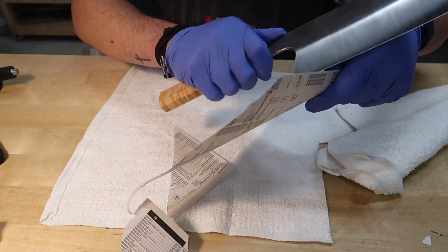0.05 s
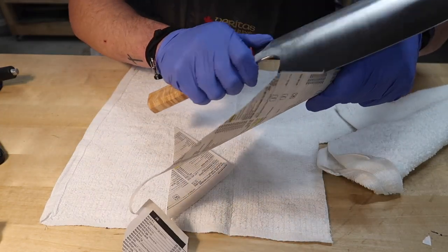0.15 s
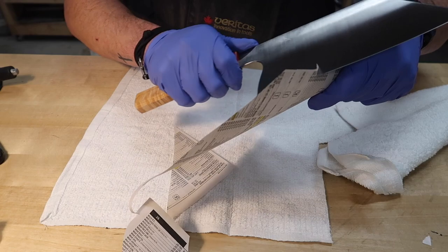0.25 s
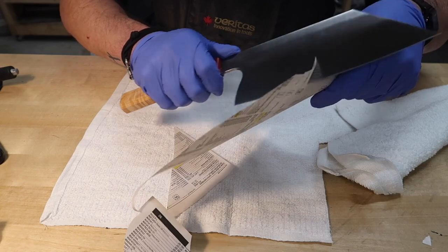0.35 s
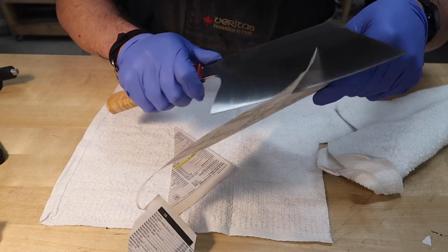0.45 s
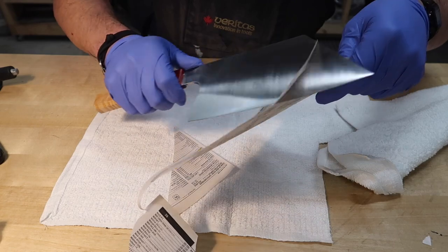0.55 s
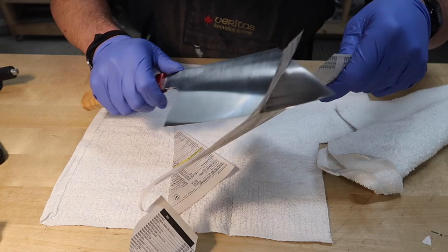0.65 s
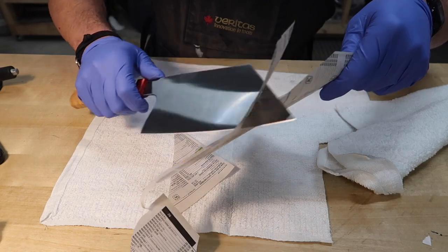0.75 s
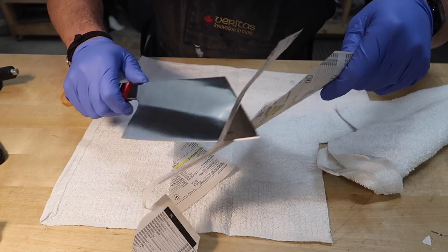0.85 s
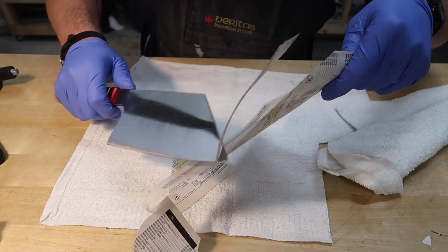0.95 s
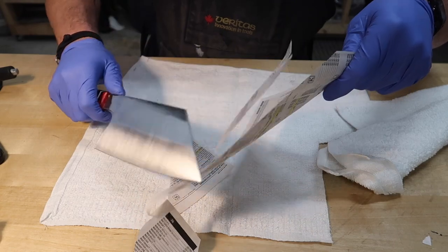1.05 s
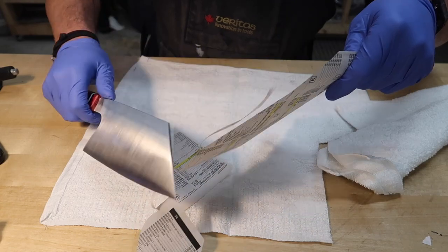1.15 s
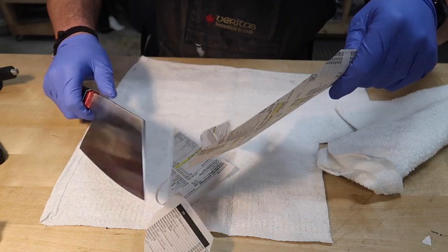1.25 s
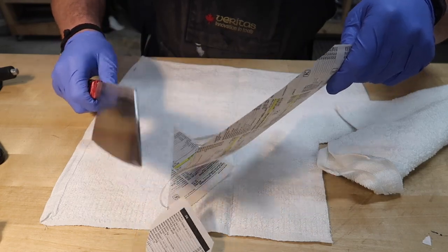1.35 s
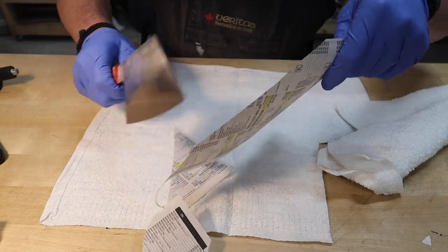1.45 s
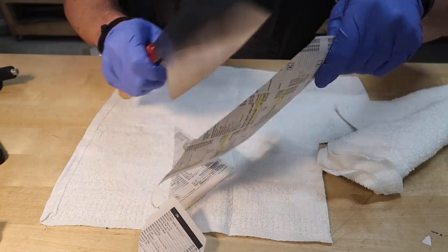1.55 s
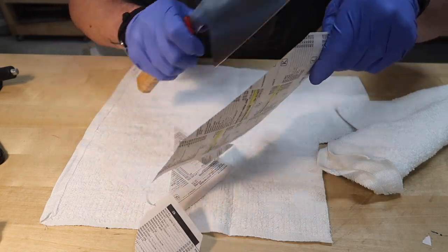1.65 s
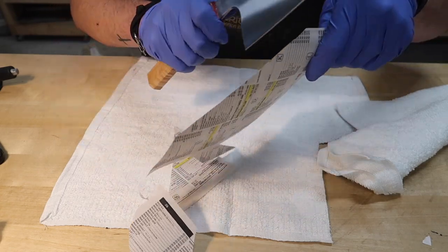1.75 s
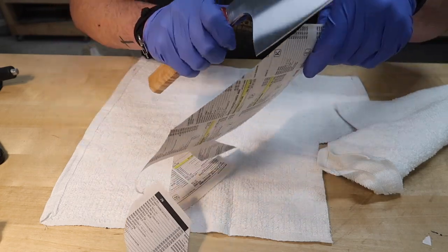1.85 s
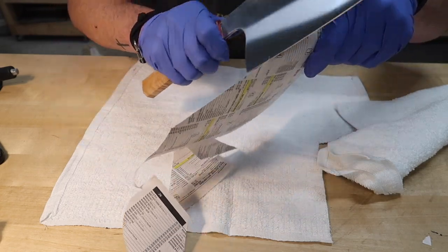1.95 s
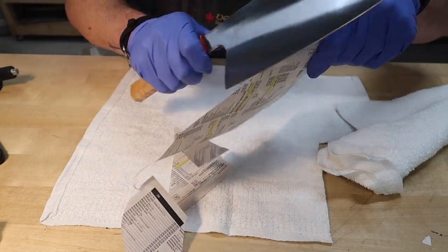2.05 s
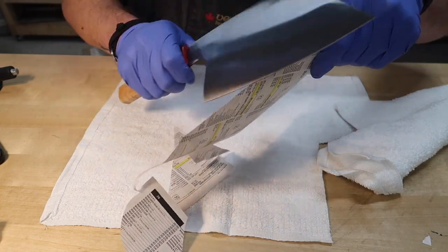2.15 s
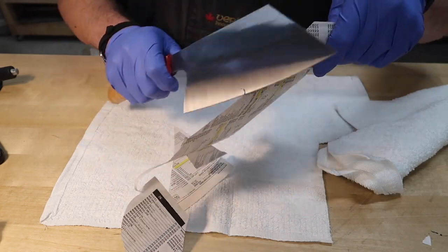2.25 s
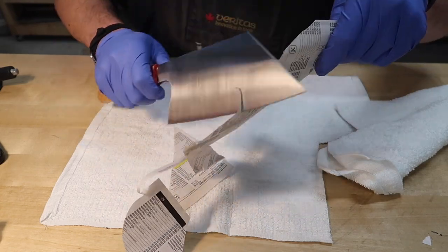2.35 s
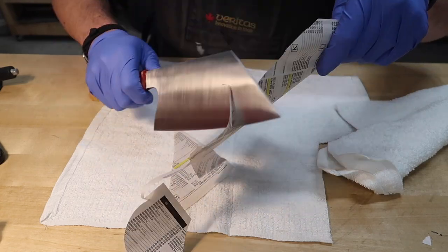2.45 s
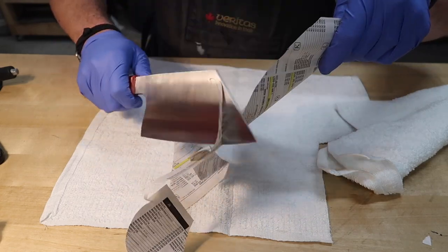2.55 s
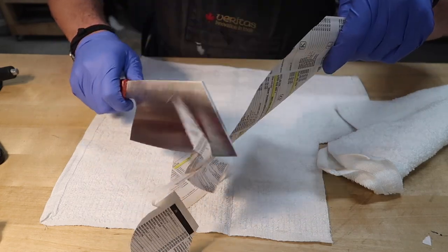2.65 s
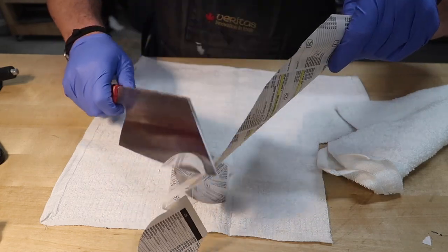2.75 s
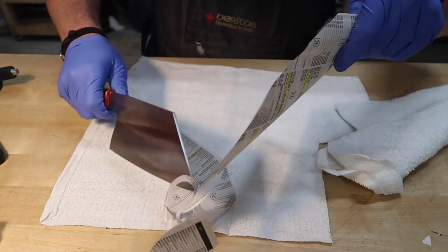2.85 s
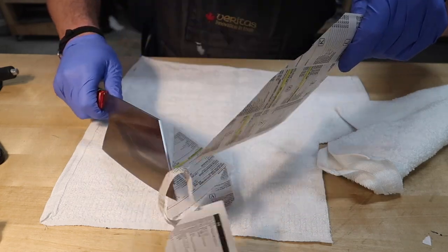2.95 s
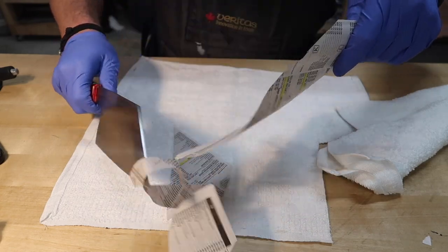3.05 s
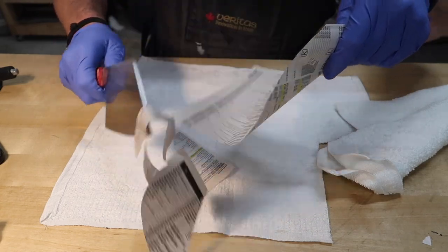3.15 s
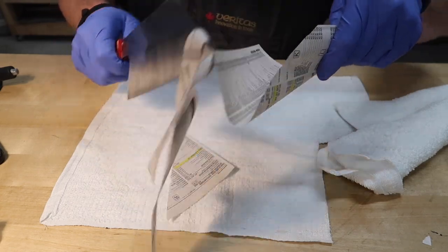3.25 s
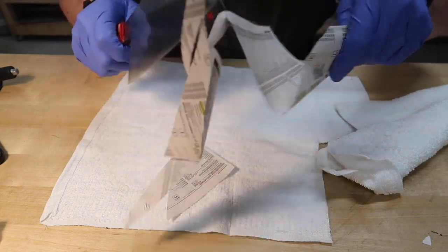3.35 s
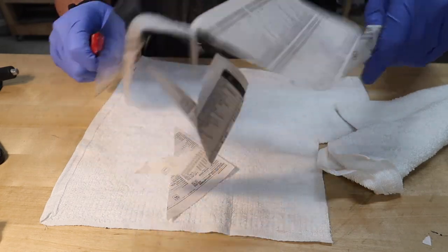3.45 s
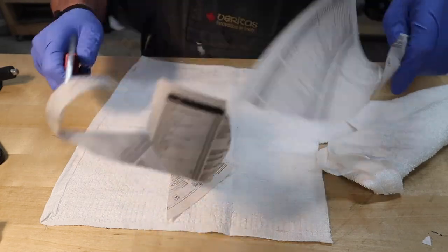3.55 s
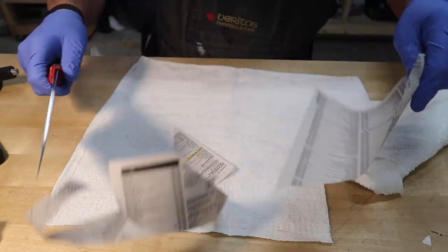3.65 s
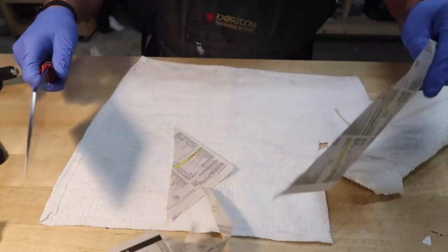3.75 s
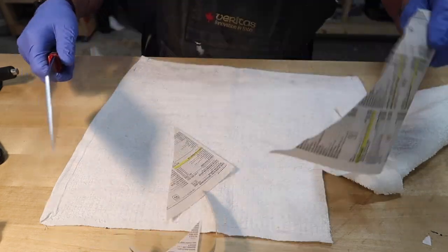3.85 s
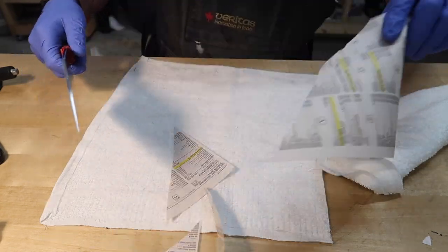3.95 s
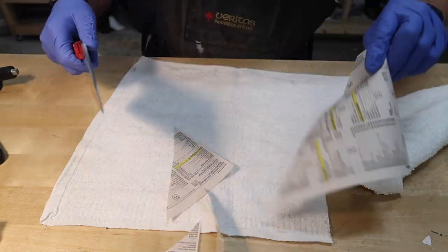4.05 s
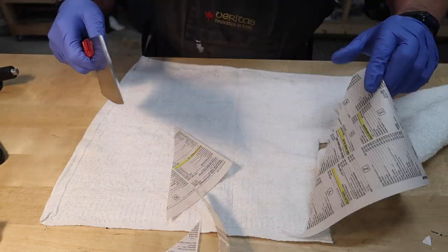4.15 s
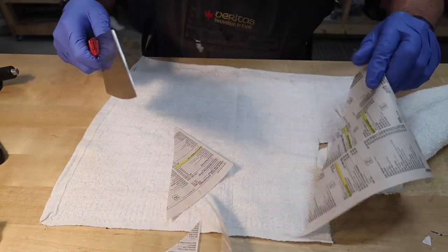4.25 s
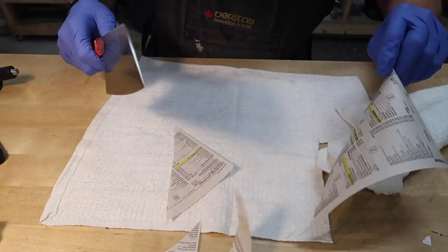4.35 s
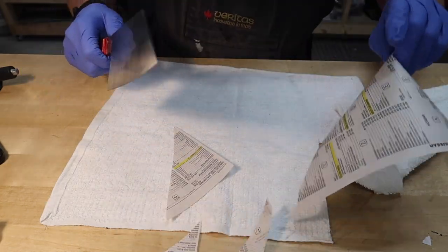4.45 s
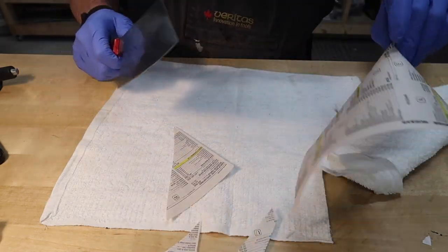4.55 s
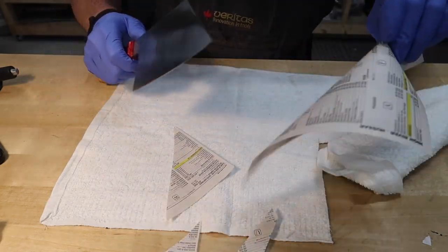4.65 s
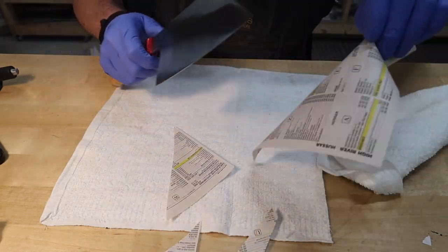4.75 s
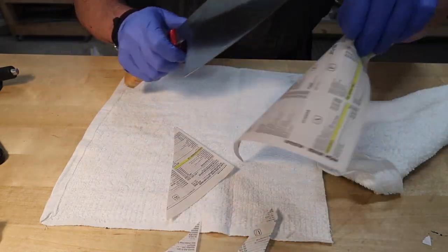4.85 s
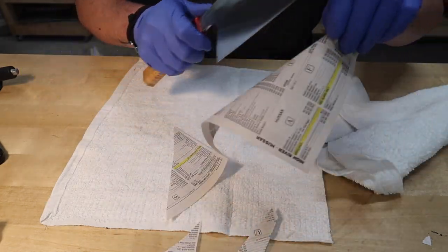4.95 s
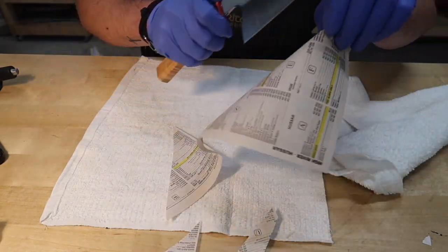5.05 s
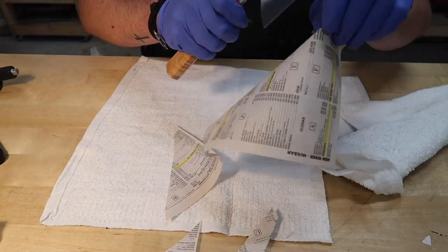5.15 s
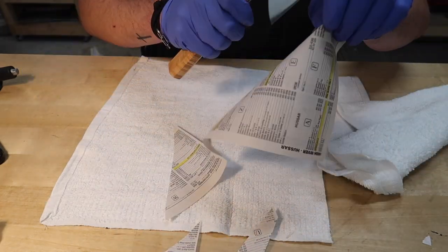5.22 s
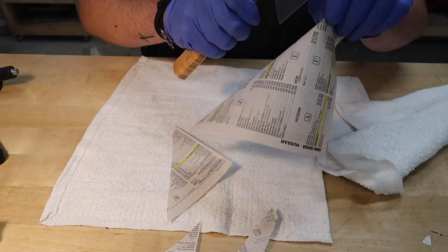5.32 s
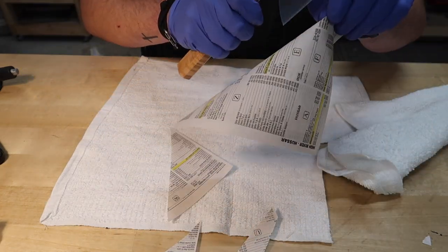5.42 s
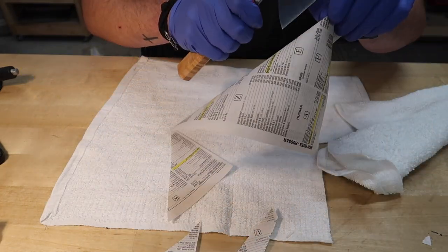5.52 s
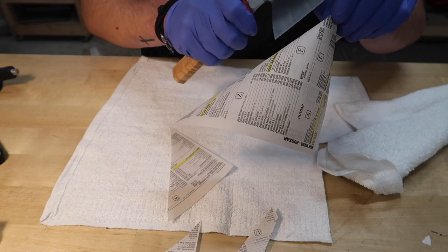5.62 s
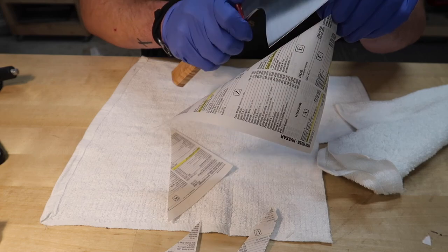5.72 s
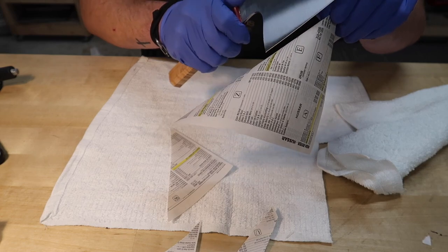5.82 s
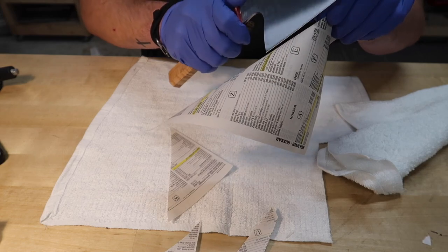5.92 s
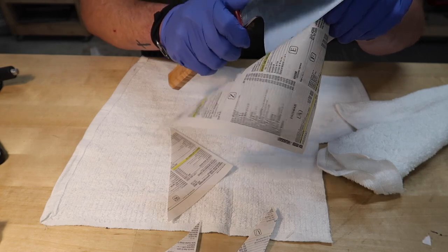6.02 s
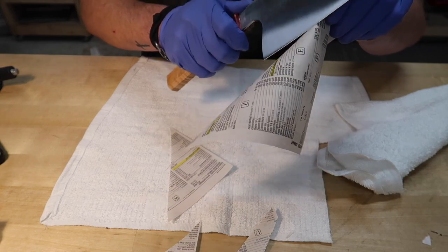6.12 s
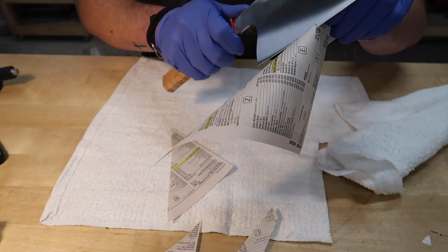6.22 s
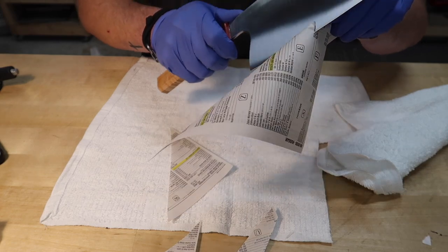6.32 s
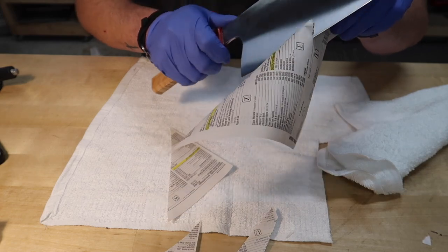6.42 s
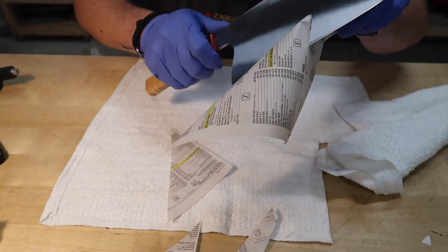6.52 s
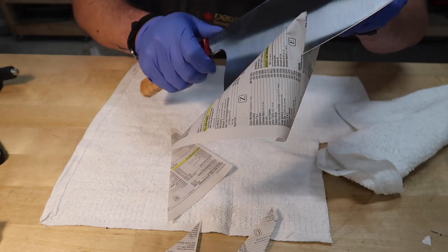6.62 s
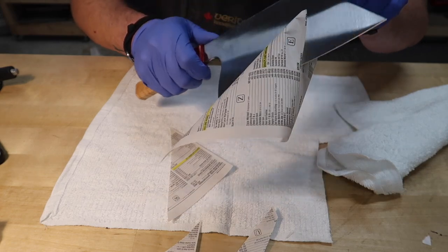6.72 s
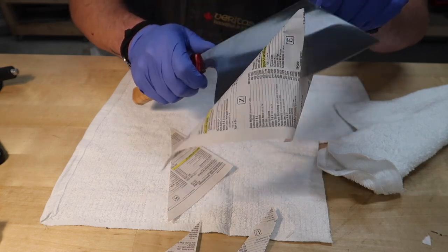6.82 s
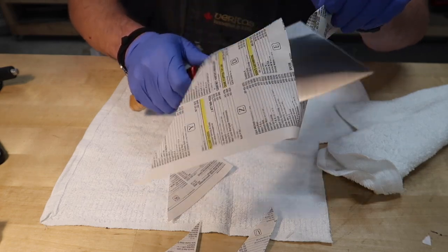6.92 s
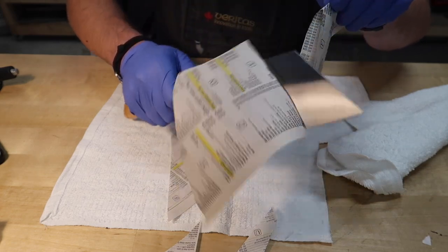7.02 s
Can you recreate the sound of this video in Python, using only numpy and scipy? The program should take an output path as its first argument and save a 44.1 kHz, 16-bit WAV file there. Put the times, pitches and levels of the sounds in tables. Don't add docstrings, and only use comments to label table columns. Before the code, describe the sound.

Close, dry paper cutting: two grainy slicing strokes, a quick tear, light crinkling as the sheet turns, then a louder final slice in a quiet room.

```python
import sys
import numpy as np
from scipy import signal
from scipy.fft import rfft, irfft, next_fast_len
from scipy.io import wavfile
from scipy.ndimage import uniform_filter1d, map_coordinates

SR = 44100
rng = np.random.default_rng(int(sys.argv[2]) if len(sys.argv) > 2 else 0)


def gain_from_db(level_db):
    decades = np.asarray(level_db, float) / 20
    return 10 ** decades


def to_wav(sig):
    pcm = np.clip(np.atleast_2d(sig), -1, 1) * 32767
    pcm = np.round(pcm).astype(np.int16)
    wavfile.write(sys.argv[1], SR, pcm.T)


N = 312228


def unit(x):
    return x / np.sqrt(np.mean(x ** 2) + 1e-20)


def along(points, hz):
    f, v = np.transpose(points)
    return np.interp(np.log(hz + 1), np.log(f + 1), v)


def wobble(rate_hz):
    knots = rng.standard_normal(int(N * 2000 / SR) + 4)
    return map_coordinates(knots, [np.arange(N) * rate_hz / SR])


def filtered(x, response):
    m = next_fast_len(N + SR // 2)
    return irfft(rfft(x, m) * response(np.fft.rfftfreq(m, 1 / SR)), m)[..., :N]


# (frequency [Hz], density [dB per Hz])
VENT_MID = [(22, -39), (38, -11), (118, -4), (148, -6), (181, -15), (205, -8.5), (299, -6.5), (331, -8.5),
            (426, -5), (483, -16), (590, -13.5), (704, -15), (5410, -26), (15600, -44)]
# (frequency [Hz], density [dB per Hz])
VENT_SIDE = [(15, -68), (25, -36), (129, -6.5), (400, -2), (723, -9), (2780, -14), (3640, -15.5),
             (5020, -18), (5900, -21), (14000, -33.5), (15600, -49)]
# (frequency [Hz], rms level [dB])
MAINS = [
    (60, -71),
    (119.5, -65.5),
    (179.5, -64.5),
]
VENT_DB = -55


def workshop():
    mid = unit(filtered(rng.standard_normal(N), lambda hz: gain_from_db(along(VENT_MID, hz))))
    mid = mid * gain_from_db(VENT_DB + 0.62 * wobble(3.57))
    side = unit(filtered(rng.standard_normal(N), lambda hz: gain_from_db(along(VENT_SIDE, hz))))
    side = side * gain_from_db(VENT_DB - 1.5)
    t = np.arange(N) / SR
    hum = np.zeros(N)
    for hz, db in MAINS:
        level = gain_from_db(db + 2.0 + 1.56 * wobble(9))
        hum += level * np.sin(2 * np.pi * hz * t + 2.27 * wobble(8))
    return np.array([mid + hum + side, mid + hum - side])


# (frequency [Hz], t60 [s])
WALLS_T60 = [(200, 0.16), (2000, 0.15), (10000, 0.27)]


def walls(x):
    hz, t, z = signal.stft(rng.standard_normal((2, SR // 2)), SR, nperseg=256)
    fall = gain_from_db(-60 * t / along(WALLS_T60, hz)[:, None])
    tail = signal.istft(z * fall, SR, nperseg=256)[1]
    tail = tail / np.linalg.norm(tail[0])
    delayed = np.pad(x, (300, 0))
    return signal.fftconvolve(delayed[None], tail, axes=1)[:, :N]


# (time [s], level [dB], ring [Hz], t60 [s], flap re ring [dB])
NICKS = [
    (0.397, -57, 2070, 0.03, -19),
    (1.346, -50, 2270, 0.034, -5),
    (1.396, -44.5, 2070, 0.023, -10),
    (2.008, -40.5, 1650, 0.018, -24),
    (2.059, -28.5, 1690, 0.11, -8.5),
    (2.106, -39, 1940, 0.045, -19),
    (3.179, -38.5, 2200, 0.032, -12),
    (3.397, -54, 2400, 0.065, 4),
    (6.113, -44, 1900, 0.052, -8),
    (6.14, -36, 2050, 0.032, -17),
]
# (time [s], level [dB], ring [Hz], t60 [s], flap re ring [dB])
BURSTS = [
    (3.522, -40, 2320, 0.022, -7),
    (3.531, -30, 2460, 0.039, -20),
    (3.556, -22, 2470, 0.044, -5),
    (3.568, -21.5, 2650, 0.0038, -6.5),
]
# (time [s], level [dB], ring [Hz], t60 [s], flap re ring [dB])
FOLDS = [(3.763, -43, 2090, 0.032, -7), (3.831, -38, 2600, 0.049, -8.5), (4.0431, -23.5, 2540, 0.025, -20),
         (4.194, -25.5, 2490, 0.036, -24), (4.352, -46, 1850, 0.018, 1), (4.382, -40, 2540, 0.032, -14),
         (4.404, -29.5, 2400, 0.024, -19), (4.468, -23.5, 2500, 0.048, -14.5),
         (4.708, -51, 2160, 0.028, -15), (5.011, -40, 2710, 0.021, -23), (5.029, -36.5, 2350, 0.033, -13),
         (5.152, -45, 2180, 0.02, -31), (5.235, -39.5, 2350, 0.041, -23), (5.308, -41, 2720, 0.021, -12.5),
         (5.342, -50, 1880, 0.056, -12), (5.391, -49, 2180, 0.057, -8), (5.42, -42, 1660, 0.083, -10),
         (5.654, -52, 2330, 0.049, -14), (5.743, -58.5, 1700, 0.058, -16), (5.772, -61, 1700, 0.03, -12)]
# (nicks [dB], bursts [dB], folds [dB])
EDGE_DB = (-24, -13.5, -21)
EDGE_DB_PER_T60_DOUBLING = -2.5


def snaps():
    out, t = np.zeros((2, N + SR)), np.arange(SR // 8) / SR
    first = round(0.011 * SR)
    pops = [(*row, edge) for rows, edge in zip([NICKS, BURSTS, FOLDS], EDGE_DB) for row in rows]
    for s, db, ring_hz, t60, flap_db, edge_db in sorted(pops):
        edge_db += EDGE_DB_PER_T60_DOUBLING * np.log2(t60 / 0.014)
        attack = 1 - np.exp(-t / (0.042 * t60))
        fall = attack * gain_from_db(-60 * t / np.clip(t60, 0.006, 0.15))
        parts = [((ring_hz / 1.44, ring_hz * 1.285), 0),
                 ((300, 950), flap_db),
                 ((4300, 12500), edge_db)]
        for band_hz, part_db in parts:
            band = signal.butter(2, band_hz, "band", fs=SR, output="sos")
            pop = signal.sosfilt(band, fall * rng.standard_normal((2, len(t))))
            pop = pop / np.std(pop[0, :first])
            out[:, round(s * SR):][:, :len(t)] += gain_from_db(db + part_db) * pop
    return out[:, :N]


ENTER_DB_PER_S = 1495


def entry(t, start):
    return -ENTER_DB_PER_S * np.clip(start - t, 0, 1)


def since(t, end):
    return np.clip(t - end, 0, 1)


# (start [s], held [s], level [dB], resonance [Hz], air re middle [dB])
RUSTLES = [(1.07, 0.045, -37.5, 2520, -20), (1.15, 0.061, -47, 2940, -17), (1.27, 0.06, -54.5, 1170, -20),
           (1.335, 0.029, -48.5, 2040, -22), (2.862, .015, -25.5, 2450, -18),
           (2.975, 0.029, -36, 2040, -28), (3.02, 0.057, -45.5, 2000, -20), (3.09, 0.061, -49, 2370, -8.5),
           (3.168, 0.048, -39, 2360, -33), (3.225, .12, -50.5, 3600, -12.5),
           (3.628, 0.0099, -25.5, 2400, -28), (6.127, 0.066, -37, 1770, -22),
           (6.2, 0.079, -41.5, 1810, -27)]
# (start [s], held [s], level [dB], resonance [Hz], air re middle [dB])
SHUFFLES = [(3.842, 0.027, -38, 2930, -22), (3.95, 0.048, -44, 3300, -54.5), (4.02, 0.055, -39, 2020, -29),
            (4.189, 0.028, -35.5, 3020, -22), (4.415, 0.025, -31.5, 2760, -24.5),
            (4.475, 0.013, -37, 2840, -21), (4.71, 0.021, -49, 1890, -33), (4.809, 0.045, -45.5, 2120, -23),
            (4.87, 0.022, -42.5, 2900, -24), (4.939, 0.14, -44, 2000, -17.5),
            (5.15, 0.035, -42.5, 1850, -20), (5.27, 0.027, -48.5, 1840, -23), (5.4, 0.037, -63, 1600, -24)]
LEAVE_DB_PER_S = 356
RUSTLE_BELLY_DB, RUSTLE_FLAP_DB, RUSTLE_HISS_DB, HISS_PER_AIR_DB = -6, -13, -4, 0.42
SLACK_RING_DB, RING_DB_PER_KHZ = 3.5, -1.5


def rustles(t):
    for s, held, db, ring_hz, air in RUSTLES + SHUFFLES:
        level = db + entry(t, s) - LEAVE_DB_PER_S * since(t, s + held)
        hiss = RUSTLE_HISS_DB + HISS_PER_AIR_DB * max(air, -26)
        ring_db = SLACK_RING_DB + RING_DB_PER_KHZ * (ring_hz / 1000 - 2)
        yield np.broadcast_arrays(level, RUSTLE_BELLY_DB, RUSTLE_FLAP_DB, hiss, air, ring_hz, ring_db)


# (time [s], level [dB], resonance [Hz], resonance height [dB])
FIRST = [
    (0.207, -43, 1300, 3),
    (.28, -37, 1700, 11),
    (.42, -30.5, 1790, 5),
    (.53, -28, 1970, 3),
    (.62, -34, 1650, 12),
    (.7, -37.5, 1900, -3),
    (.92, -39, 2850, 9),
    (1.05, -39.5, 2520, -6),
    (1.135, -41.5, 2500, 7),
]
SECOND = [
    (2.022, -37.5, 1290, 8),
    (2.2, -37.5, 2270, -14),
    (2.37, -41.5, 1500, 2.5),
    (2.42, -30, 1720, 5),
    (2.55, -31.5, 2460, 3),
    (2.65, -29.5, 2690, 15),
    (2.735, -33.5, 2700, 1),
    (2.81, -26.5, 2470, 20),
    (2.965, -27.5, 2240, 32),
]
THIRD = [
    (6.254, -36, 1730, 4.8),
    (6.289, -23.5, 1690, 10),
    (6.42, -27, 2680, 1),
    (6.52, -23.5, 2840, 7.2),
    (6.6, -22, 1910, 1.8),
    (6.8, -25, 2650, 3.4),
    (6.92, -20.5, 3320, 3.4),
    (6.99, -19.5, 2200, 5.8),
    (7.08, -27.5, 2930, 3.3),
]
# (time [s], level [dB], resonance [Hz], resonance height [dB])
RIP = [
    (3.51, -58, 3000, -2),
    (3.531, -44.5, 3190, 2),
    (3.555, -26, 2930, 0),
    (3.575, -20, 2930, 3),
    (3.62, -21.5, 2930, 0),
    (3.628, -29, 2840, -25),
]
# (time [s], level [dB], resonance [Hz], resonance height [dB])
CARRY = [
    (3.68, -38.5, 1500, 15),
    (3.82, -49, 2840, -14),
    (4, -44.5, 2400, 19),
    (4.3, -47, 2540, -3),
    (4.58, -49, 2300, -3),
    (4.68, -58.5, 1880, 10),
    (5.1, -44.5, 1930, 31),
    (5.35, -59, 2000, 2),
    (5.7, -76, 1400, 3),
]
# (flap [dB], hiss [dB], air [dB])
COLOURS = [
    (-13.5, -15.5, -24),
    (-20, -15, -21),
    (-16.5, -15, -19.5),
    (-16, -7, -14),
    (-12, -13.5, -23),
]
# (flap [dB], hiss [dB], air [dB])
LAG = (0.58, 0.24, 0.38)
# (flap [dB/s], hiss and air [dB/s])
GROWTH = [
    (8, 7.5),
    (-6.5, 2.5),
    (1, -2),
    (-11, 0),
    (-7.5, -1.5),
]
# (level re flap [dB], growth [dB/s])
BELLY = [
    (-9, -1),
    (-4.5, -3.5),
    (-3.5, 9.5),
    (-8, 0),
    (-6.5, 1),
]
CUT_OFF_DB_PER_S, AIR_STOPS_DB_PER_S = 500, 900


def strokes(t):
    motions = zip([FIRST, SECOND, THIRD, RIP, CARRY], COLOURS, GROWTH, BELLY)
    for rows, colour, (flap_grows, treble_grows), (belly, belly_grows) in motions:
        s, *columns = np.transpose(rows)
        db, ring_hz, ring_db = (np.interp(t, s, c) for c in columns)
        below_peak = db.max() - db
        flap, hiss, air = (np.minimum(rel + lag * below_peak, 0) for rel, lag in zip(colour, LAG))
        late = np.clip(t, s[0], s[-1]) - s[np.argmax(columns[0])]
        past = since(t, s[-1])
        level = db + entry(t, s[0]) - CUT_OFF_DB_PER_S * past
        belly = belly + belly_grows * late
        flap = flap + flap_grows * late
        hiss = hiss + treble_grows * late
        air = air + treble_grows * late - AIR_STOPS_DB_PER_S * past
        yield level, belly, flap, hiss, air, ring_hz, ring_db


# (frequency [Hz], density [dB per Hz])
PAPER = [(88, -56), (150, -40), (269, -15), (669, -4), (987, 0.5), (2560, 2.5), (4850, -14), (6250, -20),
         (8200, -28), (13300, -28.5), (15600, -38)]
# (low [Hz], high [Hz])
BANDS = [
    (150, 420),
    (480, 900),
    (1000, 4000),
    (4300, 7500),
    (8500, 15000),
]


def sheet():
    cracks = gain_from_db(2.1 * wobble(1500) + 0.9 * wobble(150) + 0.4 * wobble(30))
    hz, t, z = signal.stft(unit(cracks * rng.standard_normal((2, N))), SR, nperseg=256)
    curves = np.swapaxes(list(strokes(t)) + list(rustles(t)), 0, 1)
    level_db, belly_db, flap_db, hiss_db, air_db, ring_hz, ring_db = curves
    power = gain_from_db(2 * np.maximum(level_db, -120))
    ring_hz, ring_db = (np.sum(power * v, axis=0) / power.sum(axis=0) for v in (ring_hz, ring_db))
    bump = 1 / (1 + ((hz[:, None] - ring_hz) / 400) ** 2)
    colour = gain_from_db(along(PAPER, hz)[:, None] + np.clip(ring_db, 0, 12) * bump)
    band_db = (flap_db + belly_db, flap_db - 1.0, 0, np.minimum(hiss_db, -6), air_db)
    wanted = 10 * np.log10([np.sum(power * gain_from_db(2 * rel), axis=0) for rel in band_db])
    centres = np.log(np.sqrt(np.prod(BANDS, axis=1)))
    shares = np.transpose([np.interp(np.log(hz + 1), centres, one) for one in np.eye(len(BANDS))])
    for _ in range(3):
        had = []
        for lo, hi in BANDS:
            inside = colour[(hz >= lo) & (hz < hi)]
            had.append(10 * np.log10(np.sum(inside ** 2, axis=0) / len(hz)))
        colour = colour * gain_from_db(shares @ (wanted - np.array(had)))
    return signal.istft(z * colour, SR, nperseg=256)[1][:, :N]


def buckles(x):
    z = signal.stft(x, nperseg=512)[2]
    field = uniform_filter1d(rng.standard_normal(z.shape[1:]), size=2, axis=0)
    field = uniform_filter1d(field, size=16, axis=1)
    return signal.istft(z * gain_from_db(2.53 * unit(field) - 0.88), nperseg=512)[1][:, :N]


# (time [s], comb spacing [Hz], echo share [1])
BLADE = [(.2, 1440, 0.27), (.43, 1520, 0.37), (.46, 1950, 0.36), (.7, 2040, 0.25), (.8, 1770, 0.12),
         (.9, 2820, 0.032), (2, 1840, -0.17), (2.95, 1640, 0.051), (3.3, 1620, -0.16), (3.7, 1260, 0.024),
         (4.05, 1320, -0.42), (4.15, 1880, -0.15), (4.5, 1970, -0.28), (4.7, 1246, -0.25),
         (6.1, 1190, -0.16), (6.45, 1113, -0.39), (6.7, 1200, -0.28), (7.08, 1150, -0.14)]


def blade(x):
    hz, t, z = signal.stft(x, SR, nperseg=512)
    s, spacing_hz, share = np.transpose(BLADE)
    blur = np.exp(-(hz[:, None] / 11000) ** 2)
    echo = np.clip(np.interp(t, s, share), -0.8, 0.8) * blur
    bounce = np.exp(-2j * np.pi * hz[:, None] / np.interp(t, s, spacing_hz))
    comb = np.sqrt(1 - echo ** 2) / (1 - echo * bounce)
    return signal.istft(z * comb, SR, nperseg=512)[1][:, :N]


# (frequency [Hz], side re mid [dB])
WIDTH = [(60, -22), (120, -11), (240, -11), (480, -27), (950, -63), (1890, -24.5), (3770, -6), (7520, 1),
         (15000, 0.5)]
# (time [s], widening [dB])
ASIDE = [(.3, 13), (1, 2), (2.1, 10), (2.7, -1), (3.2, 7), (3.8, 12.5), (4.7, 17), (5.1, 6), (6.2, 5),
         (6.5, -5), (7.08, -1)]


def ports(near, other):
    shifted = filtered(near, lambda hz: 0.5j * gain_from_db(along(WIDTH, hz)))
    side = shifted + filtered(other, lambda hz: 0.46 * gain_from_db(along(WIDTH, hz)))
    body = filtered(side, lambda hz: 1 / (1 + (hz / 3600) ** 4))
    aside_db = np.interp(np.arange(N) / SR, *np.transpose(ASIDE))
    treble = gain_from_db(0.17 * aside_db + 2.3) * (side - body)
    side = gain_from_db(aside_db - 9) * body + treble
    return np.array([near + side, near - side])


def scene():
    near, other = blade(buckles(sheet()) + snaps())
    balance = gain_from_db([[-0.2], [0.2]])
    return ports(near, other) * balance + gain_from_db(-48) * walls(near) + workshop()


def band_limit(x):
    return signal.sosfilt(signal.butter(12, 15710, fs=SR, output="sos"), x)


def record(dry):
    return band_limit(dry)


dry = scene()
out = record(dry)
to_wav(out)
```